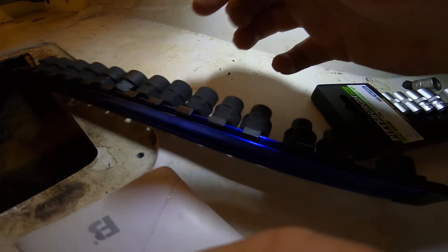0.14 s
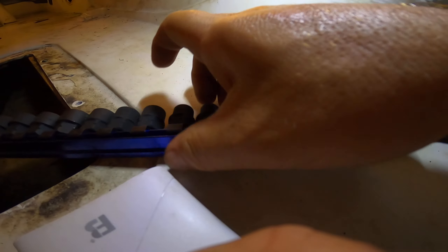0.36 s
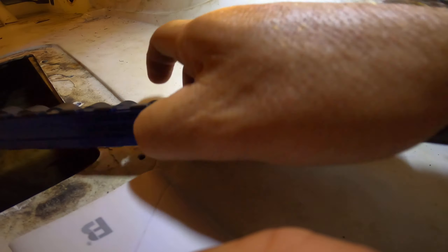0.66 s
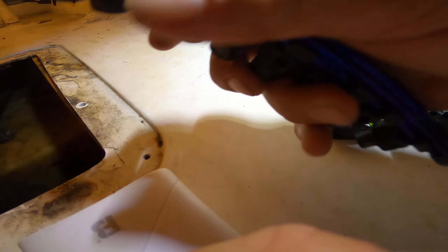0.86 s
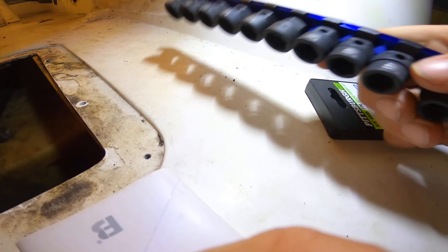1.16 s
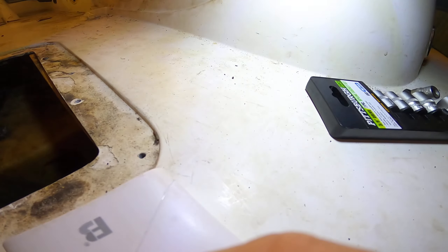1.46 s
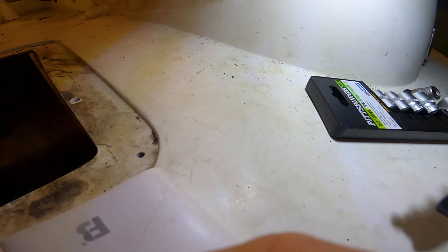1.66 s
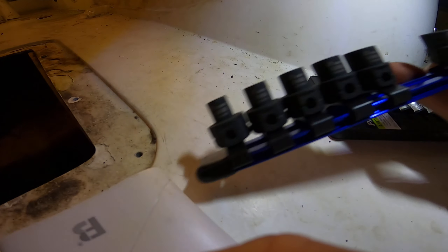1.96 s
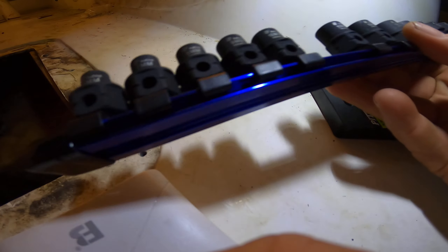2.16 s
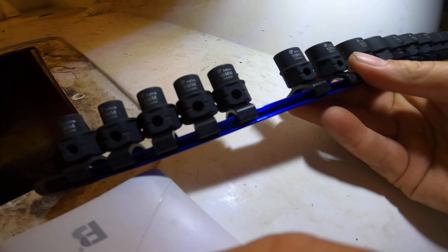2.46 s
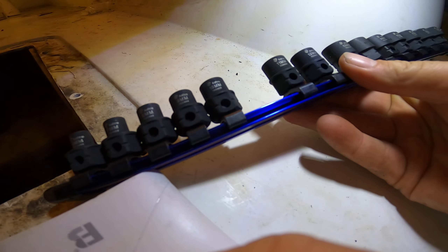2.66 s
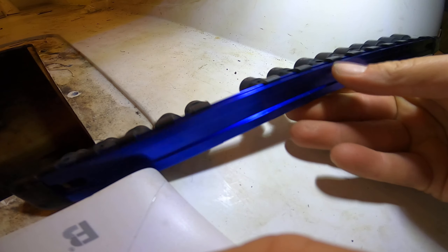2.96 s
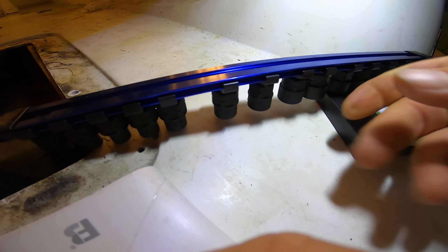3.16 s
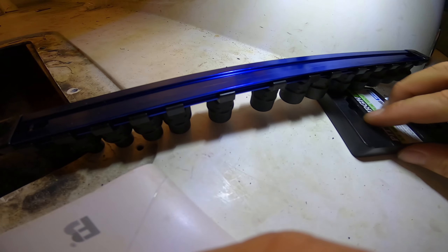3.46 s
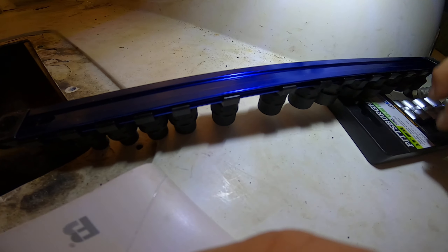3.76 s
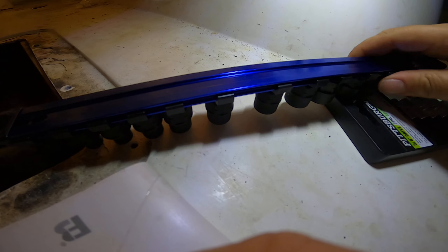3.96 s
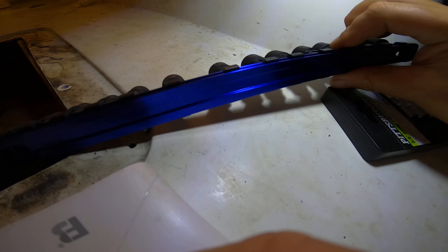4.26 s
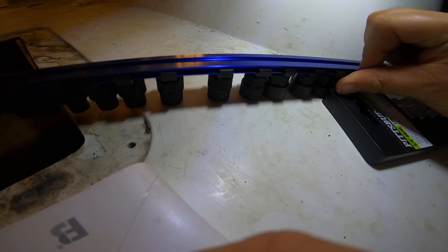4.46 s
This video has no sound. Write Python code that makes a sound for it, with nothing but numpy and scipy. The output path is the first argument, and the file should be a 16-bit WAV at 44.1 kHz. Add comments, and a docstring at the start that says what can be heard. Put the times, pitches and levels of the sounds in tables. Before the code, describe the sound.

Small steel sockets click and rattle on a plastic rail as it is handled and knocked against a hollow boat deck.

```python
"""Sharp ticks, clacks and hollow knocks: a plastic rail of steel sockets is turned over by hand and laid
on a boat deck. Each impact excites the damped modes of deck skin, rail, socket clips and sockets;
friction keeps them rattling and scraping, the rail squeaks once, and the hull thuds and booms.
The cockpit adds short echoes. Behind lie a low rumble of air, an outdoor wash, a thin band of
insect song and a faint whine."""
import sys
import numpy as np
from scipy import signal
from scipy.fft import rfft, irfft, next_fast_len
from scipy.io import wavfile
from scipy.ndimage import uniform_filter1d

SR = 44100
rng = np.random.default_rng(int(sys.argv[2]) if len(sys.argv) > 2 else 0)


def digitize_waveform(pressure):
    """Quantize a signal to 16-bit integers and store it at the path in sys.argv[1].

    Rows of a 2-D input are taken as channels; values are limited to [-1, 1].
    """
    field = np.atleast_2d(pressure).T
    bounded = np.clip(field, -1, 1)
    quanta = np.round(bounded * 32767).astype(np.int16)
    wavfile.write(sys.argv[1], SR, quanta)


N = 203389

# Impacts: (time [s], deck peak [dB], plastic level [dB], socket peak [dB], favoured pitch [Hz],
# left-right lean [dB])
BLOWS = [(0.0137, -33.5, -25.5, -11, 3280, -0.5), (0.057, -57, -43, -44.5, 3710, 10),
         (0.097, -48, -34, -41, 3660, 7), (0.1034, -33, -26.5, -24.5, 5970, 1),
         (0.1069, -27.5, -29, -28, 1320, -7), (0.1148, -46, -46, -10.5, 8440, -2),
         (0.1449, -49, -47, -22.5, 6300, -3), (0.2199, -15, -17, -5.5, 5940, -1),
         (0.2455, -27, -23, -29, 1930, 0), (0.2554, -14, -1.5, -10.5, 2510, 2.5),
         (0.3301, -39, -48, -55, 1050, 0), (0.3477, -22, -23.5, -45, 3600, 3),
         (0.3986, -29, -33, -31, 1830, 1), (0.4366, -29, -33.5, -46, 3170, 2),
         (0.461, -32, -31.5, -29, 3400, -1), (0.4659, -30, -24.5, -45, 1650, 7),
         (0.4993, -29, -47, -60, 897, -3), (0.5882, -59, -63, -50, 1110, -2.5),
         (0.6094, -48, -63, -55, 1070, 2.5), (0.635, -64, -49, -44, 3420, -3),
         (0.6527, -43, -31, -18, 7560, -4.5), (0.6609, -53, -46, -33.5, 7100, 10),
         (0.6906, -49, -37, -35, 3500, -0.5), (0.74, -32.5, -52.5, -44.5, 926, 0.5),
         (0.7982, -59, -54, -50, 6350, -1), (0.8243, -48, -45.5, -51.5, 3370, 0),
         (0.9387, -46, -49.5, -55.5, 1320, 0), (0.9612, -61, -47, -37, 7660, -2),
         (0.9797, -70, -49, -38, 7540, -1.5), (1.0244, -58.5, -62, -46, 4920, -2),
         (1.0548, -64, -35, -21, 3870, -0.5), (1.1096, -54, -56, -45, 3560, -0.5),
         (1.133, -64, -54, -44, 6100, 7.5), (1.1427, -58, -36, -22, 7600, -2),
         (1.161, -40, -29, -14.5, 6940, -2), (1.1775, -40, -34.5, -29, 7400, -2),
         (1.2158, -59, -41.5, -32.5, 3700, -1), (1.243, -63, -52, -43, 3500, 0),
         (1.2635, -79, -43, -47, 3450, -0.5), (1.302, -71, -44.5, -43, 3500, -0.5),
         (1.3327, -54, -45.5, -38.5, 3650, -0.5), (1.4082, -33, -29, -25, 3900, -0.5),
         (1.4432, -40, -25, -13, 8440, 1), (1.7426, -40, -41, -49.5, 2010, 0.5),
         (1.782, -62, -52, -52, 3700, 0), (1.871, -48, -22, -12.5, 8400, -2),
         (1.9395, -50, -44.5, -62, 1894, 12.5), (1.965, -53, -52, -52, 2400, 3),
         (2.074, -36, -31, -20.5, 5980, -1), (2.1307, -28, -23.5, -22, 3130, 0.5),
         (2.17, -49, -36, -33.5, 1670, 0), (2.2181, -43, -43, -53, 1400, 7),
         (2.242, -44, -45, -45, 1070, -3), (2.433, -20.5, -17.5, -23.5, 1760, 3),
         (2.4602, -31.5, -49, -58, 856, -3), (2.6692, -25.5, -23, -25.5, 1820, 0.5),
         (2.7994, -39.5, -51, -63, 860, 4), (2.9736, -34, -39, -59, 1690, -4),
         (2.9803, -32, -34, -57, 2470, 2), (3.0049, -13, -17, -49, 1040, 4),
         (3.009, -9.5, -13.5, -31, 2130, -1), (3.078, -9, -18, -46, 948, 4),
         (3.1483, -17.5, -39, -35, 1000, -4), (3.16, -8.5, -11, -27.5, 1075, -1),
         (3.1793, -11, -12.5, -26, 3500, -1), (3.2104, -23, -23, -52, 1900, 5),
         (3.216, -11, -18.5, -28, 950, -1), (3.2384, -14, -17, -35, 1420, 0),
         (3.2738, -25.5, -46, -37, 840, 3), (3.288, -28, -46, -27.5, 1420, 0),
         (3.3409, -19.5, -53, -53, 1060, 1), (3.3442, -16.5, -57, -38, 1034, -2),
         (3.3552, -33, -29, -40, 705, 1), (3.3636, -29, -16.5, -34, 1570, -0.5),
         (3.3734, -18.5, -61, -46, 1390, -2), (3.4042, -31.5, -38, -60, 1050, 7),
         (3.4525, -25.5, -35, -33.5, 1280, -1), (3.4661, -32, -55, -56, 1000, -4),
         (3.4806, -32, -32, -45, 1340, 0), (3.502, -12, -34, -36, 1160, -1),
         (3.525, -16.5, -27, -55, 1350, 5), (3.531, -12.5, -12, -32, 1400, 0),
         (3.62, -24, -34, -51, 1290, -3), (3.7819, -39, -33, -57, 3960, 0),
         (3.847, -45.5, -47.5, -69, 1020, 0), (3.88, -46, -43.5, -45, 2580, 0.5),
         (4.063, -47, -49, -49, 3300, -1), (4.0896, -29.5, -31.5, -86, 1576, 1),
         (4.1017, -44, -49, -38, 1580, -2), (4.123, -31, -38, -29, 1200, -0.5),
         (4.1373, -27, -36, -47, 1020, 1), (4.1593, -18.5, -15.5, -39, 2420, 1),
         (4.1783, -16.5, -22, -22.5, 2160, -0.5), (4.209, -18, -43, -36, 1080, 1),
         (4.223, -18.5, -46, -31, 1050, 1.5), (4.2617, -24, -57, -50, 1020, -7),
         (4.2709, -8.5, -22.5, -57, 1380, 3), (4.2944, -43, -47, -29, 1150, 0),
         (4.3079, -21, -40, -52, 924, 5), (4.3145, -17, -47, -35, 860, 0),
         (4.344, -12, -25.5, -27.5, 1370, 0), (4.3809, -9.5, -13.5, -22.5, 2660, 0.5),
         (4.467, -26, -49, -53, 1320, -2), (4.4977, -14, -33.5, -47, 1120, 0),
         (4.514, -19, -41, -52, 1000, 1), (4.531, -27, -25.5, -25, 1500, 1),
         (4.56, -14, -17.5, -33, 1570, 0), (4.5987, -12, -3.5, -16.5, 3600, -4.5)]
# Resonances: (frequency [Hz], bandwidth [Hz], relative gain [dB])
SKIN_MODES = [(560, 104, -4.5), (756, 110, -4), (887, 190, -1), (1032, 180, 0), (1203, 144, -1),
              (1290, 129, -3.5), (1481, 152, -6.5)]
RAIL_MODES = [(1619, 166, -0.15), (1935, 280, -3), (2266, 390, -3.83), (2753, 110, -5.6)]
CLIP_MODES = [(3076, 128, 3.75), (3571, 300, 4), (4140, 810, -2.5)]
SOCKET_MODES = [(4830, 810, 2), (5534, 960, 4.5), (6570, 1540, 2.5), (7665, 270, -2), (8470, 1110, -7),
                (8680, 4200, -11), (11570, 2300, -33.5), (15300, 500, -28.5)]
DEEP_MODES = [(70.4, 30.3, 2), (92.3, 14, 6.5), (109.6, 41, 2), (151.5, 36, -4)]
HOLLOW_MODES = [(153, 13.3, -5), (209, 30, -3), (274.6, 25.9, 0.5), (327.7, 29, -4.5), (398, 87, -15)]
SQUEAK_MODES = [(1630, 66, -2), (1950, 50, -3.5)]
RUMBLE_BANDS = [(35.2, 18, 2.5), (61, 9.8, 1), (93, 41, -8.5)]
PART_MODES = (SKIN_MODES, RAIL_MODES, CLIP_MODES, SOCKET_MODES)
# Contact of each part: (decay constant [s], softness [samples], weight of the lean [ratio])
CONTACTS = [(0.00077, 23.5, 0.21), (0.0022, 8.8, 0.44), (0.0012, 5.27, 1.06), (0.0021, 2.1, 2.98)]
# Rattle of each part after a blow: (level relative to the blow [dB], rise [s], t60 [s])
AFTER_RATTLE = [(-16.5, .008, 0.11), (-29, .008, 0.075), (-30.5, 0.0027, 0.16), (-30, .01, 0.16)]
# Rubbing along the rail: (time [s], skin level [dB], socket level [dB])
RUBBING = [(0.0, -51, -53), (.2, -65, -59), (.36, -39, -54.5), (.6, -65, -74.5), (.92, -65.5, -90),
           (1.1, -67.5, -60.5), (1.37, -61.5, -72), (1.65, -64, -82), (2.05, -58.5, -72.5),
           (2.35, -57.5, -69), (2.55, -61.5, -83), (2.94, -55, -75.5), (3.25, -30.5, -48),
           (3.33, -49.5, -70), (3.82, -54.5, -81.5), (4.0, -59, -97.5), (4.12, -41, -75),
           (4.47, -40.5, -61), (4.61, -49, -74)]
# Scrapes and jingles: (start [s], duration [s], skin [dB], rail [dB], clips [dB], sockets [dB])
SCRAPES = [(0.095, 0.082, -48, -47.5, -42.5, -41), (0.206, 0.045, -38, -51, -45, -38),
           (0.449, 0.074, -45, -46, -53.5, -59), (0.637, 0.035, -65, -60, -56.5, -51),
           (1.054, 0.059, -61, -76, -64, -58), (1.135, 0.071, -55, -51, -48.5, -46),
           (1.407, 0.047, -47, -57, -46, -42), (2.062, 0.036, -66, -58, -56, -51),
           (2.102, 0.19, -53, -52.5, -59, -59.5), (2.402, .06, -51.5, -63, -60, -74),
           (2.979, 0.08, -39, -35.5, -44, -55), (3.084, 0.14, -32.5, -37.5, -44, -67),
           (3.333, 0.065, -35, -46, -53.5, -58), (3.469, 0.079, -33, -38.5, -50, -60),
           (3.555, 0.24, -43, -43.5, -49, -61), (3.844, 0.031, -58, -49, -55.5, -66),
           (4.135, 0.071, -27, -29.5, -37.5, -46), (4.186, 0.26, -36, -45, -47.5, -56),
           (4.361, 0.081, -34.5, -42.5, -43, -69), (4.484, 0.053, -30.5, -40, -55, -54),
           (4.57, .04, -29.5, -51, -46, -49)]
# Sockets ringing free: (time [s], frequency [Hz], level [dB], t60 [s])
PINGS = [(.27, 15400, -79, 1.2), (.262, 8350, -66, .2), (2.362, 12380, -66, .42), (2.362, 11650, -76, .1),
         (2.362, 1500, -47, .07), (2.362, 3560, -60, .12), (3.215, 15400, -78, .2)]
# The rail landing on the hull: (time [s], peak [dB], favoured pitch [Hz])
THUDS = [(0.216, -13, 420), (0.258, -10, 438), (0.299, -20.5, 200), (.332, -21.5, 163), (0.357, -20, 273),
         (0.386, -23, 200), (0.502, -20, 286), (1.406, -27, 266), (2.132, -30.5, 163), (2.462, -20.5, 265),
         (2.801, -22, 268), (3.009, -27, 270), (3.081, -26, 270), (3.161, -20.5, 290), (3.214, -25, 270),
         (3.262, -23.5, 268), (3.347, -27.5, 270), (3.531, -27.5, 272), (4.169, -31, 270),
         (4.273, -27, 320), (4.345, -9, 253), (4.381, -19, 248), (4.6, -20.5, 270)]
# The hull pushed by hand and rail: (time [s], deep level [dB], hollow level [dB])
BOOMS = [(.02, -31, -49), (.222, -17, -21), (0.26, -34, -25), (.31, -20.5, -34), (0.362, -20.5, -23),
         (0.423, -21.5, -28.5), (0.503, -41, -31.5), (.738, -57, -53.5), (1.408, -35, -38),
         (1.769, -41, -59), (1.99, -38.5, -57), (2.13, -25.5, -37), (2.379, -31.5, -55),
         (2.458, -25.5, -27.5), (2.671, -30.5, -36.5), (2.8, -27, -30.5), (3.02, -28.5, -30.5),
         (3.08, -33, -30), (3.156, -18, -19.5), (3.213, -20, -24.5), (3.26, -41, -43), (3.349, -27, -30),
         (3.51, -30, -33), (3.556, -28, -59), (3.651, -31.5, -35), (4.099, -30, -32.5),
         (4.167, -25.5, -24.5), (4.229, -34, -26), (4.279, -32, -22.5), (4.336, -24, -16),
         (4.418, -25, -33), (4.505, -32, -29.5), (4.599, -16, -20)]
# Reverberation time of the cockpit: (frequency [Hz], t60 [s])
COCKPIT_T60 = [(500, 0.096), (1700, 0.13), (4600, 0.077), (12000, 0.029)]
# Lag of the left microphone port: (frequency [Hz], delay [samples])
LEFT_LAG = [(300, 1), (2600, 2.2), (4000, 1.8), (5500, 2.7), (8300, 1.47), (11000, 3.6)]
# Spectrum of the outdoor wash: (frequency [Hz], relative density [dB])
WASH_SPECTRUM = [(88, -54.5), (150, -13.5), (233, -6.5), (312, -17), (368, -15), (541, -26), (675, -23),
                 (1540, -26.5), (1950, -29), (2350, -36.5), (6430, -50), (12000, -83.5), (15600, -119),
                 (22000, -120)]
# Left-right likeness of the wash: (frequency [Hz], correlation [ratio])
WASH_CORRELATION = [(150, 1), (640, 0.73), (1400, 0.59), (3100, 0.76), (6800, 0.05)]
# Wash and insects sink and return together: (time [s], gain [dB])
OUTDOOR_GAIN = [(0, 9), (.5, 2), (.85, -13.5), (1.1, -6.5), (1.5, -1.5), (2.4, 5.5), (3.0, 5), (3.7, 1.5),
                (4.1, 3.5), (4.61, 11)]
# Insect song: (frequency [Hz], bandwidth [Hz], level [dB])
INSECT_BANDS = [(6450, 200, -72), (6326, 160, -72.5), (3740, 470, -75)]
# Course of the whine: (time [s], frequency [Hz], level [dB])
WHINE_PATH = [(.65, 2070, -81.5), (.8, 2050, -72), (1.5, 1977, -65), (2.1, 1886, -60), (2.25, 1910, -83),
              (2.4, 1620, -92), (2.55, 1583, -60), (2.7, 1623, -74), (2.78, 1630, -49), (2.88, 1657, -66),
              (3.0, 1810, -71), (3.1, 1780, -108)]


def blows():
    """Modal impact: a burst of ragged contacts rings each part, most strongly near the favoured pitch."""
    length, favour_db, favour_log_width = 1200, 8, 0.098
    out, t = np.zeros((2, N + length)), np.arange(length) / SR
    draws = rng.standard_normal((len(BLOWS), length + 1))
    for (s, *_, struck_hz, pan_db), peaks_db, (detune, *grit) in zip(BLOWS, blow_levels().T, draws):
        at = round(s * SR)
        for modes, (contact_s, softness, lean), db in zip(PART_MODES, CONTACTS, peaks_db):
            excited = []
            for hz, width, mode_db in modes:
                nearness = np.exp(-(np.log(hz / struck_hz) / favour_log_width) ** 2)
                excited.append((hz * (1 + .025 * detune), width, mode_db + favour_db * nearness))
            force = np.array(grit) ** 3 * np.exp(-t / contact_s) * (1 - np.exp(-t / 0.00028))
            motion = ring(softened(force, softness), excited)
            sound = np.gradient(motion)  # small parts radiate little bass
            pan = gain_of(lean * np.array([[pan_db], [-pan_db]]) / 2)
            out[:, at:at + length] += pan * gain_of(db) * sound / abs(sound).max()
    return out[:, :N]


def blow_levels():
    """Division of a blow among the parts, in dB: steely, high blows favour the clips over the rail."""
    _, deck_db, plastic_db, steel_db, hz, _ = np.transpose(BLOWS)
    octaves = np.clip(np.log2(hz / 2600), -1, 1)
    shift_db = 0.074 * (steel_db - deck_db) - 0.12 + 2 * octaves
    return np.array([deck_db, plastic_db - shift_db, plastic_db + shift_db, steel_db])


def rattle():
    """Shot-noise excitation: tiny random contacts ring the parts in rubs, in scrapes and after blows."""
    contacts_per_s = 2500
    strength = gain_of(2.6 * np.minimum(rng.exponential(1, (9, N)), 5)) * rng.standard_normal((9, N))
    grains = strength * (rng.random((9, N)) < contacts_per_s / SR)
    own, sideways, shared = grains[:4], grains[4:8], grains[8]
    clumps = gain_of(2.64 * slow_noise(400))
    skin_db, steel_db = curves(RUBBING)
    gap_db = steel_db - skin_db  # rail and clips rub at levels interpolated from skin and steel
    rub_db = [skin_db, skin_db + 0.38 * gap_db + 0.72, skin_db + 0.61 * gap_db + 3.4, steel_db]
    times, blow_db, scraping = [blow[0] for blow in BLOWS], blow_levels(), scrapes()
    out = 0
    for k, modes in enumerate(PART_MODES):
        _, softness, lean = CONTACTS[k]
        after_db, rise_s, t60 = AFTER_RATTLE[k]
        after = swells(times, blow_db[k] + after_db, rise_s, t60)
        level = np.sqrt(gain_of(rub_db[k]) ** 2 + after ** 2 + scraping[k] ** 2)
        force = own[k] + 0.96 * shared + 0.61 * lean * np.outer([1, -1], sideways[k])
        out = out + level * unit_rms(ring(softened(force * clumps, softness), modes))
    return out


def scrapes():
    """Sliding friction: the amplitude of each part rises, holds and falls over a scrape."""
    out = np.zeros((4, N))
    for s, length_s, *levels_db in SCRAPES:
        shape = signal.windows.tukey(round(length_s * SR), alpha=0.49)
        out[:, round(s * SR):][:, :len(shape)] += gain_of(levels_db)[:, None] * shape
    return out


def pings():
    """Free vibration: single modes of loose sockets decay exponentially, beating as they fade."""
    out, rise_s, beat_hz = 0, .004, 23
    for s, hz, db, t60 in PINGS:
        t = np.maximum(np.arange(N) / SR - s, 0)
        envelope = np.minimum(t / rise_s, 1) * gain_of(db - 60 * t / t60)
        beating = 1 + 0.475 * np.cos(2 * np.pi * beat_hz * t)
        out = out + envelope * beating * np.sin(2 * np.pi * hz * t)
    return out


def squeak():
    """Stick-slip friction: rough forcing drives two narrow rail tones that sag in pitch and fade."""
    start_s, rise_s, t60, level_db, sag_per_s = .455, 0.0095, 0.18, -29.5, 0.317
    t = np.arange(SR // 4) / SR
    tone = unit_rms(ring_twice(rng.standard_normal(len(t)), SQUEAK_MODES))
    sagging = np.interp(t - sag_per_s * t ** 2 / 2, t, tone)
    envelope = np.minimum(t / rise_s, 1) * gain_of(level_db - 60 * t / t60)
    out = np.zeros(N)
    out[round(start_s * SR):][:len(t)] = sagging * envelope
    return out


def hull_thuds():
    """Impulse response: one soft push leaves the hollow modes and the lowest skin mode ringing."""
    length, favour_db, favour_octaves = 2000, 9.5, .35
    out, push = np.zeros(N + length), softened(signal.unit_impulse(length), 26)
    modes = HOLLOW_MODES + [(*SKIN_MODES[0][:2], HOLLOW_MODES[-1][2])]
    for s, db, struck_hz in THUDS:
        excited = []
        for hz, width, mode_db in modes:
            nearness = np.exp(-(np.log2(hz / struck_hz) / favour_octaves) ** 2)
            excited.append((hz, width, mode_db + favour_db * nearness))
        thud = ring(push, excited)
        out[round(s * SR):][:length] += gain_of(db) * thud / abs(thud).max()
    return out[:N]


def hull_boom():
    """Forced vibration: lumpy pushes drive the low hull modes, which swell above a faint steady stir."""
    shared, side = rng.standard_normal((2, N))
    push = softened(shared, 30) + 1.09 * np.array([side, -side])
    lumps = gain_of(2 * slow_noise(700))
    times, deep_db, hollow_db = np.transpose(BOOMS)
    deep_level = np.hypot(swells(times, deep_db, rise_s=0.018, t60=0.47), gain_of(-46))
    hollow_level = np.hypot(swells(times, hollow_db, rise_s=0.0038, t60=0.38), gain_of(-56))
    deep = unit_rms(ring_twice(push, DEEP_MODES))
    hollow = unit_rms(ring(push * lumps, HOLLOW_MODES))
    return deep_level * deep + hollow_level * hollow


def cockpit_echoes(x):
    """Reverberation: sparse reflections of random sign, each frequency band dying at its own rate."""
    taps = np.zeros((2, 8000))
    at = np.arange(60, 7970, 20) + rng.integers(0, 20, (2, 396))
    np.put_along_axis(taps, at, rng.choice([-1., 1.], at.shape), 1)
    taps[1] = .5 * taps[0] + 0.54 * taps[1]  # partly alike left and right
    hz, t, spectra = signal.stft(taps, SR, nperseg=128)
    decay = gain_of(-60 * t / at_frequency(COCKPIT_T60, hz)[:, None])
    tail = signal.istft(spectra * decay, SR, nperseg=128)[1]
    return signal.fftconvolve(x, tail / np.linalg.norm(tail[0]), axes=1)[:, :N]


def microphone_ports(x):
    """Phase delay: sound from the deck reaches the left port slightly later than the right."""
    size = next_fast_len(N + 64)
    hz = np.fft.rfftfreq(size, 1 / SR)
    delay = np.exp(-2j * np.pi * hz * at_frequency(LEFT_LAG, hz) / SR)
    return np.array([irfft(rfft(x[0], size) * delay, size)[:N], x[1]])


def air_rumble():
    """Random pressure fluctuation: a steady low stir of air, a little different at each port."""
    shared, side = rng.standard_normal((2, N))
    pressure = shared + 0.12 * np.array([side, -side])
    return gain_of(-47.5) * unit_rms(ring(pressure, RUMBLE_BANDS))


def outdoor_wash():
    """Partially coherent noise: alike on both sides in the bass, nearly independent in the treble."""
    frames, hz = N // 256 + 5, np.fft.rfftfreq(1024, 1 / SR)
    left_re, left_im, other_re, other_im, patches = rng.standard_normal((frames, 513, 5)).T
    patches = unit_rms(uniform_filter1d(uniform_filter1d(patches, 10, axis=0), 12, axis=1))
    likeness = at_frequency(WASH_CORRELATION, hz)[:, None]
    left = left_re + 1j * left_im
    right = likeness * left + np.sqrt(1 - likeness ** 2) * (other_re + 1j * other_im)
    colour = gain_of(at_frequency(WASH_SPECTRUM, hz)[:, None] + 0.5 * patches)
    wash = signal.istft(np.array([left, right]) * colour, nperseg=1024, noverlap=768)[1]
    return gain_of(-53.5) * unit_rms(wash[:, :N])


def insects():
    """Amplitude-modulated noise: insect song in narrow bands that waver together."""
    hiss = rng.standard_normal((2, N)) * gain_of(3.9 * slow_noise(2500))
    return sum(gain_of(db) * unit_rms(ring_twice(hiss, [(hz, width, 0)]))
               for hz, width, db in INSECT_BANDS)


def whine():
    """Frequency modulation: a faint wavering tone sinks, fades and comes back lower, rising."""
    hz, db = curves(WHINE_PATH)
    waver_hz = 3.4 * slow_noise(3000)
    return gain_of(db) * np.sin(2 * np.pi * np.cumsum(hz + waver_hz) / SR)


def ring(x, modes):
    """Modal superposition: a sum of damped resonances, neighbours of opposite sign."""
    out = 0
    for k, (hz, width, db) in enumerate(modes):
        pole = np.exp((2j * np.pi * hz - np.pi * width) / SR)
        out = out + (-1) ** k * gain_of(db) * signal.lfilter([1 - abs(pole)], [1, -pole], x).imag
    return out


def ring_twice(x, modes):
    """Resonators in cascade: a second pass steepens the skirts of each peak."""
    return ring(ring(x, modes), modes)


def softened(x, samples):
    """Contact compliance: a soft contact spreads each push in time and so loses treble."""
    return signal.lfilter(np.hanning(round(samples) + 2)[1:-1], 1, x)


def swells(times, levels_db, rise_s, t60):
    """Incoherent addition: the amplitude of overlapping, decaying swells whose powers add."""
    powers, t = np.zeros(N), np.arange(SR // 2) / SR
    np.add.at(powers, np.round(np.asarray(times) * SR).astype(int), gain_of(levels_db) ** 2)
    shape = np.minimum(t / rise_s, 1) * gain_of(-60 * t / t60)
    return np.sqrt(abs(signal.oaconvolve(powers, shape ** 2)[:N]))


def slow_noise(samples):
    return unit_rms(uniform_filter1d(rng.standard_normal(N), samples))


def gain_of(db):
    return 10 ** (np.asarray(db) / 20)


def unit_rms(x):
    return x / np.sqrt(np.mean(x ** 2) + 1e-20)


def at_frequency(points, hz):
    points_hz, values = np.transpose(points)
    return np.interp(np.log(hz + 1), np.log(points_hz + 1), values)


def curves(rows):
    times, *columns = np.transpose(rows)
    return [np.interp(np.arange(N) / SR, times, column) for column in columns]


def scene():
    """Linear superposition: the handled rail, its echoes and the hull over the outdoor background."""
    handling = blows() + rattle() + pings() + squeak()
    near = handling + gain_of(-13) * cockpit_echoes(handling) + hull_boom() + hull_thuds()
    rumble = air_rumble()
    outdoors = gain_of(curves(OUTDOOR_GAIN)[0]) * (outdoor_wash() + insects())
    return microphone_ports(near) + rumble + outdoors + whine()


def record(dry):
    """Saturation and band limiting: peaks stop at full scale, then a low-pass cuts the top treble."""
    cutoff_hz = 16480
    lowpass = signal.firwin(511, cutoff_hz, window=("kaiser", 9), fs=SR)
    return signal.oaconvolve(np.clip(dry, -1, 1), lowpass[None], "same")


dry = scene()
out = record(dry)
digitize_waveform(out)
```